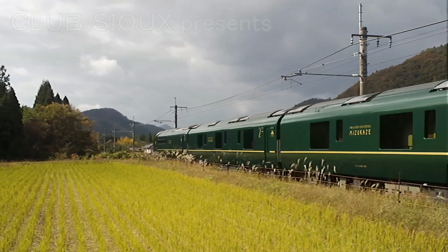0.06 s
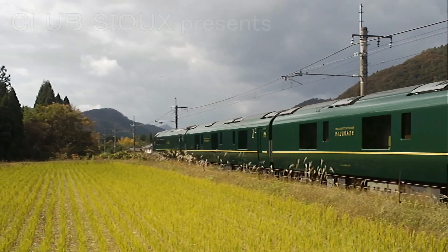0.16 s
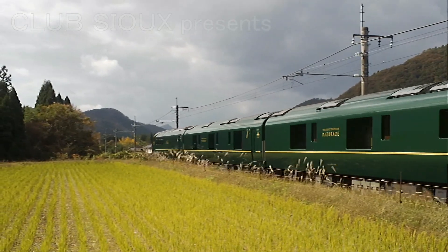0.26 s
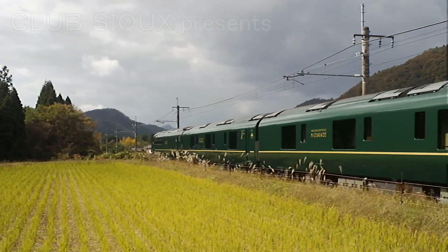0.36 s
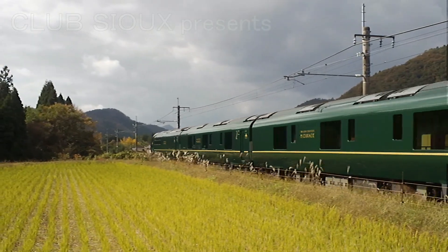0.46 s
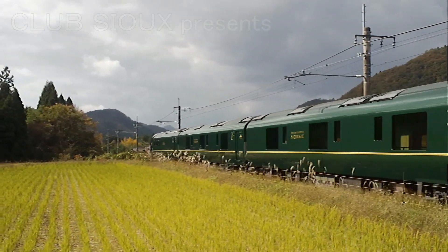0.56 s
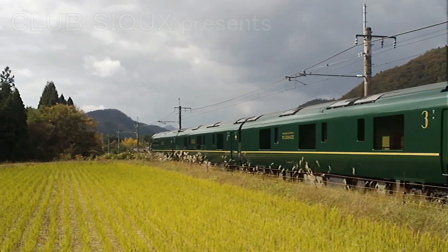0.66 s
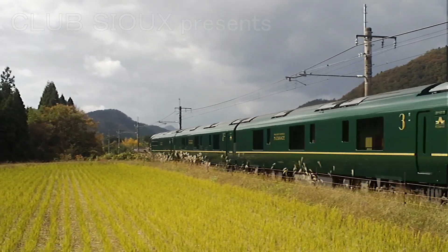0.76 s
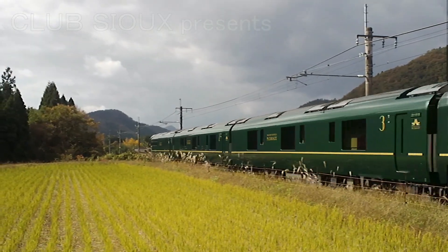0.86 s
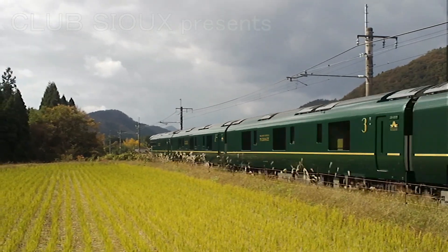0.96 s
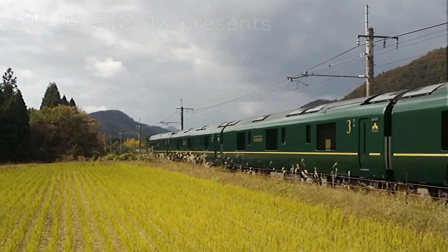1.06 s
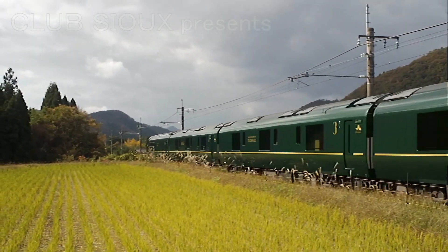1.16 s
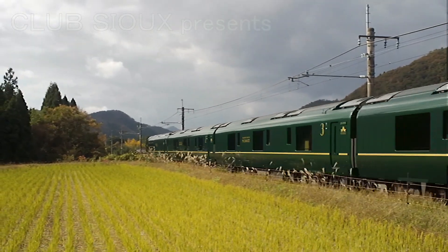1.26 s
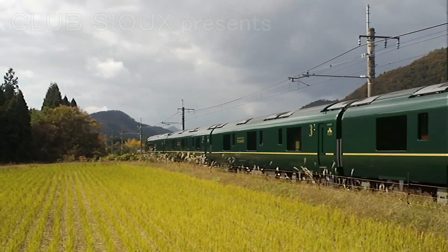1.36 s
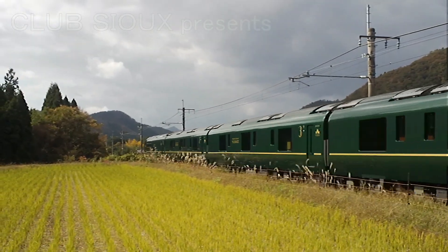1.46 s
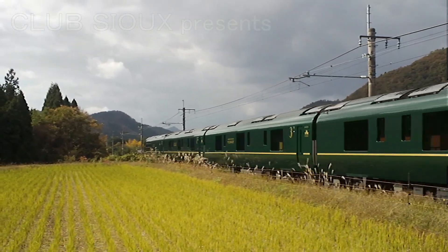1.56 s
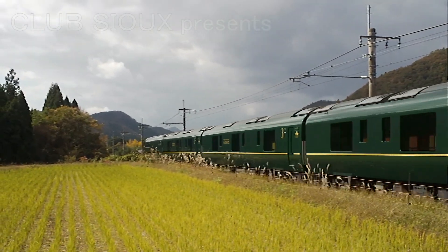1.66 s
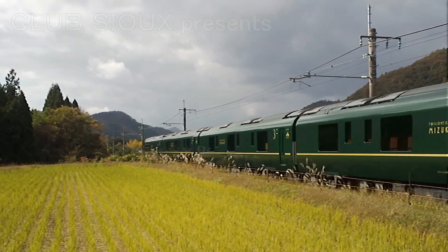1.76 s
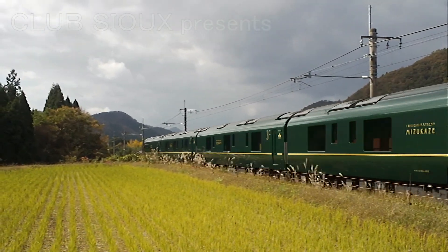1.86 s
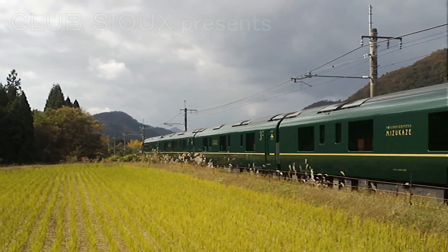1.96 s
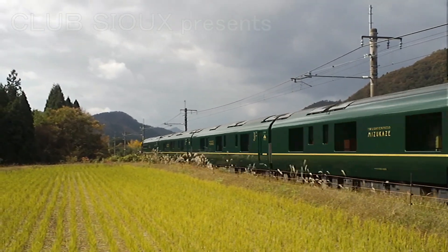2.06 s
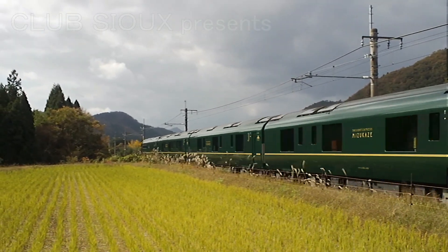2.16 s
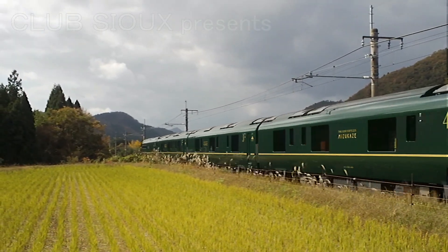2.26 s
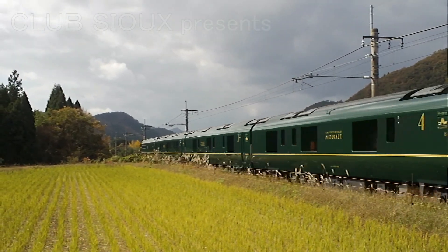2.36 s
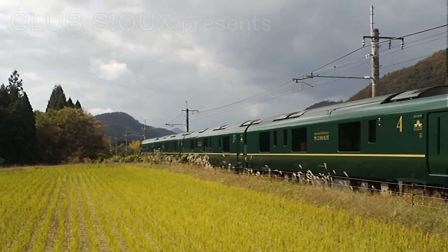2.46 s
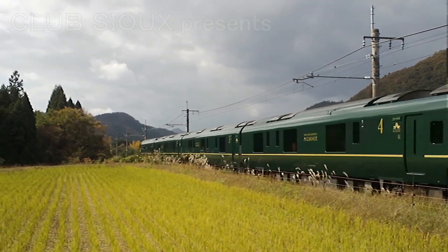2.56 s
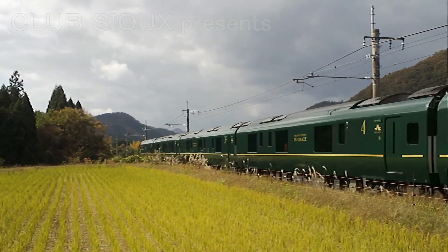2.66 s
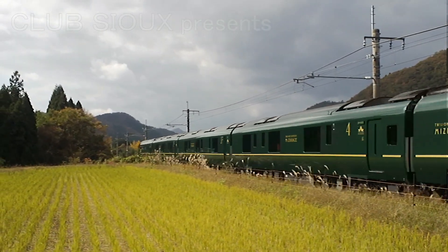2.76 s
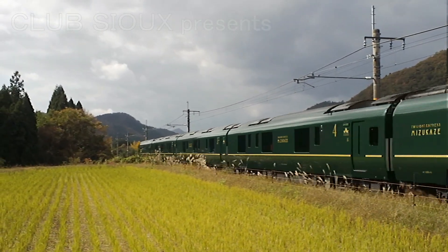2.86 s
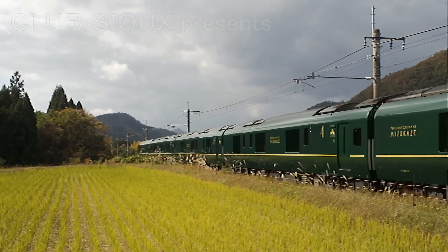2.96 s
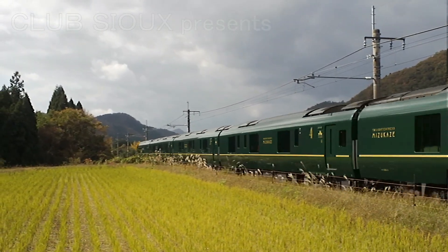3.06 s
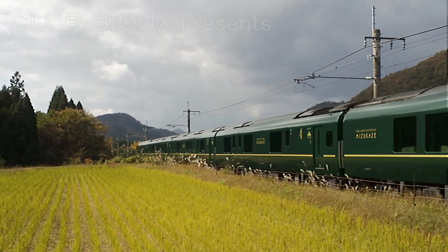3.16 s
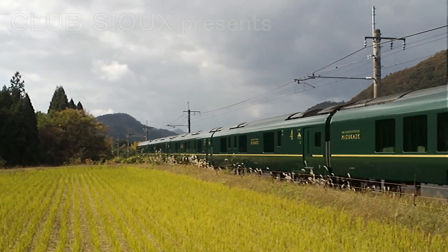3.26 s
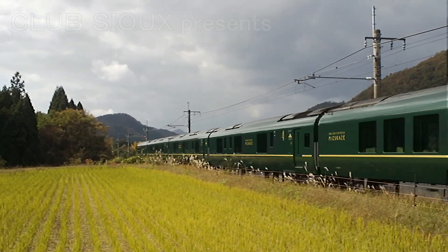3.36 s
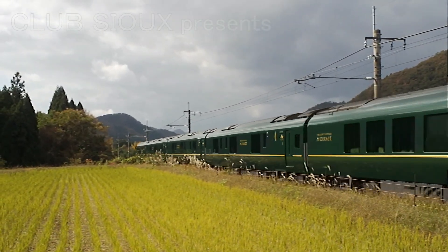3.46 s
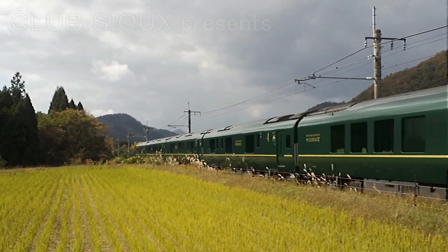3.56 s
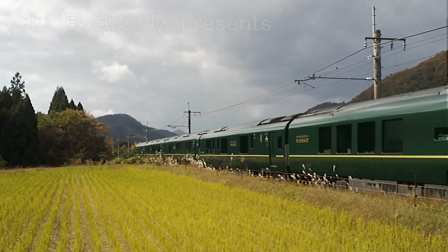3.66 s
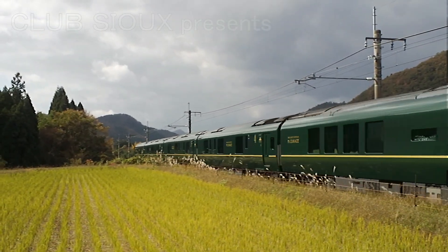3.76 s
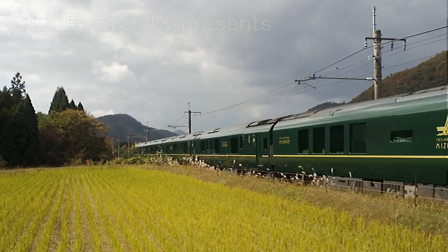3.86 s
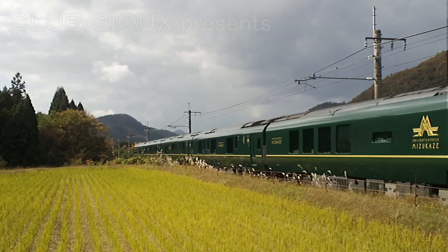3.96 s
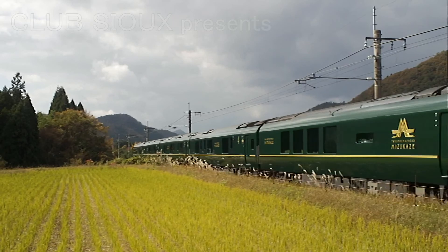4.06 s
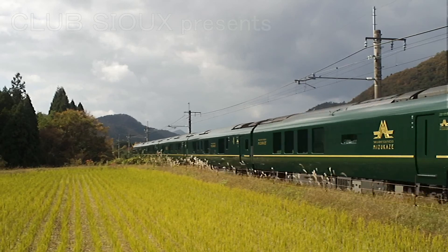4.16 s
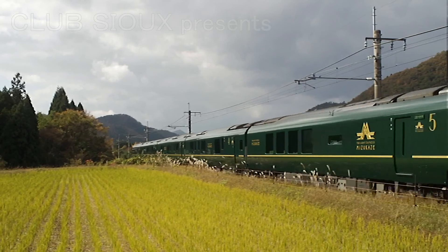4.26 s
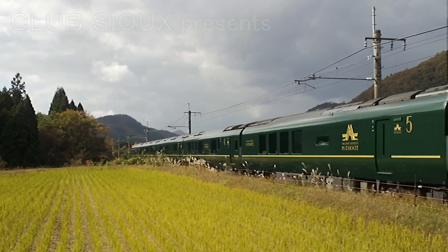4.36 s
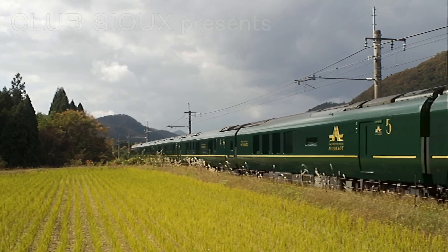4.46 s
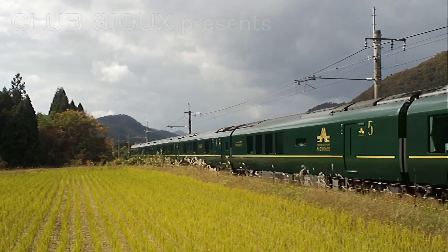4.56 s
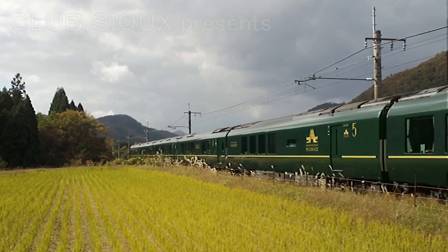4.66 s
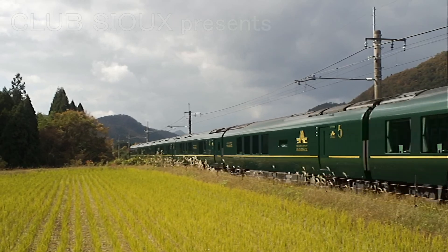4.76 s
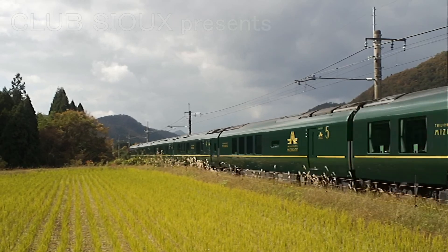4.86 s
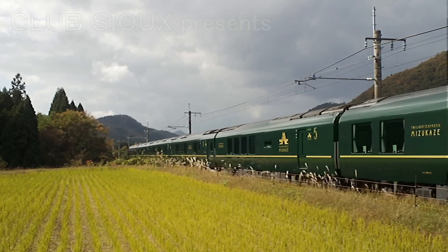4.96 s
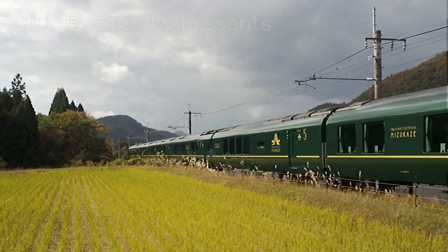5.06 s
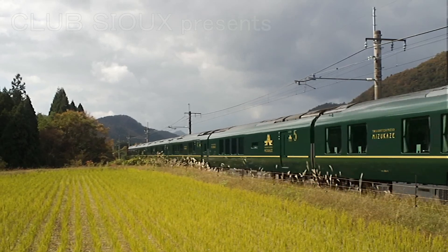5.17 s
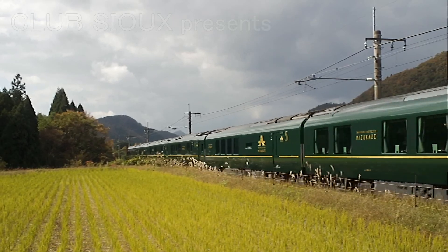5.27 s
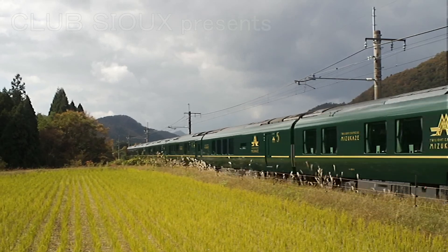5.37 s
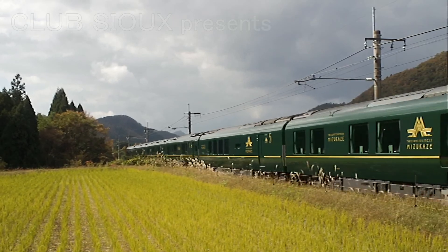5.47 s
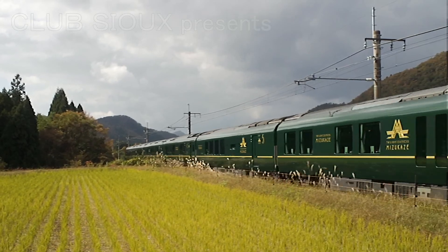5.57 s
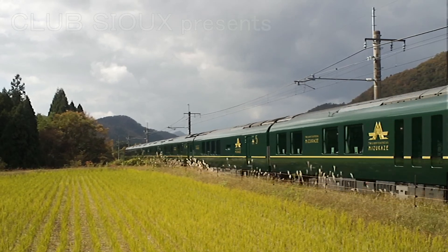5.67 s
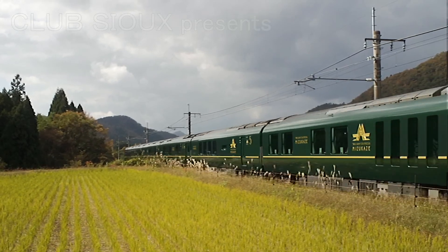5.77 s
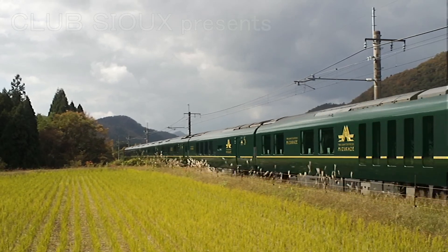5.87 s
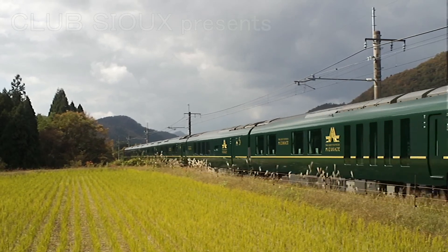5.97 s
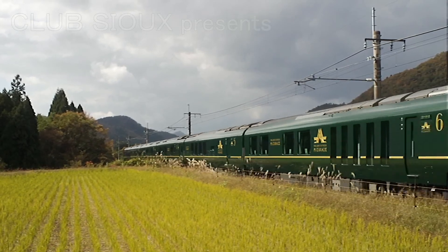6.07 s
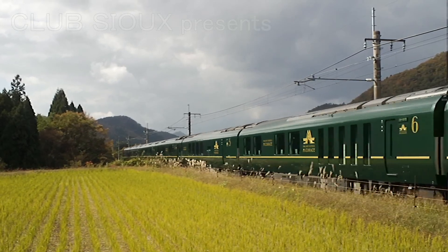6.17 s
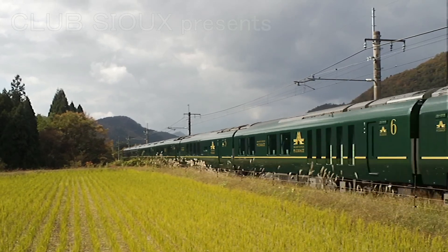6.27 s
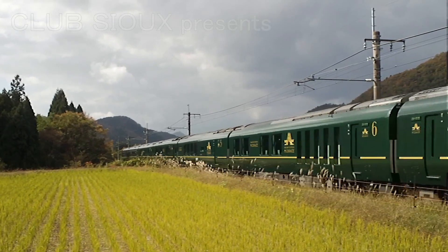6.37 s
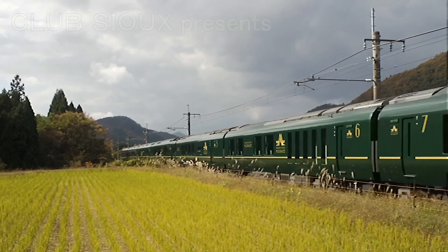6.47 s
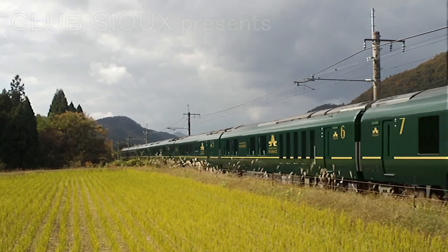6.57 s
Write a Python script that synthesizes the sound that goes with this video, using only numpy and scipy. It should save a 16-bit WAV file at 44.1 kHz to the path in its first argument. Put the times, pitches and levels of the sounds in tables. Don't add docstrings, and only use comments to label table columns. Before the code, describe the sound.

Beside an open field, a diesel passenger train passes steadily. Wheels strike a nearby rail joint in hard paired clunks, with softer thumps from farther joints between them. Rumble, rolling roar, thin hiss and droning underfloor engines with a faint whine fill the gaps. Wind flutters on the microphone, and a strong late gust overloads it.

```python
import sys
import numpy as np
from scipy import signal
from scipy.fft import rfft, irfft, next_fast_len
from scipy.io import wavfile
from scipy.ndimage import uniform_filter1d, map_coordinates

SR = 44100
rng = np.random.default_rng(int(sys.argv[2]) if len(sys.argv) > 2 else 0)


def dump(signal):
    limited = np.clip(np.atleast_2d(signal).T, -1, 1)
    pcm = np.round(limited * 32767).astype(np.int16)
    wavfile.write(sys.argv[1], SR, pcm)


def voltage_ratio(decibels):
    exponent = np.asarray(decibels, float) / 20
    return 10 ** exponent


N = 292383

# [start_s, level_db]
GUST = [(0, -19.5), (.3, -23), (.5, -24), (.75, -12.5), (.92, -13), (.98, -36), (3.5, -50.5), (3.7, -20),
        (4.3, -26), (4.5, -13), (4.6, -33.5), (5.5, -31), (5.57, -20), (5.67, -13.5), (5.8, -4),
        (6.27, -18), (6.39, -35), (6.63, -17)]
# [centre_s, level_db, length_s, bright_edge_db]
EDDIES = [(0.22, -19, 0.022, -29), (0.303, -14, 0.038, -24), (0.456, -21, 0.045, -28),
          (0.515, -16.5, 0.024, -40), (0.726, -15, 0.032, -29), (0.766, -6.5, 0.044, -17),
          (3.773, -22, 0.014, -19), (3.993, -9, 0.058, -9), (4.239, -27, 0.03, -16.5),
          (4.464, -17.5, 0.056, -28), (5.603, -3, 0.039, -27), (5.723, -10.5, 0.014, -21.8),
          (5.814, -4, 0.044, -26), (5.891, -6, 0.036, -30), (6.166, -11.5, 0.025, -23),
          (6.352, -15, 0.048, -17.9), (6.407, -8, 0.0073, -6), (6.562, -12.5, 0.026, -18)]
# [start_s, peak_db, extra_in_difference_db]
SLAPS = [
    (5.791, -17, -1),
    (5.838, -15, 8.5),
    (5.847, -16, 7),
    (5.898, -11.5, 1.5),
    (5.917, -17, 7),
    (5.924, -24, 8.5),
    (5.959, -20, 2),
    (6.032, -21, 8),
    (6.052, -19, 1),
    (6.208, -24, 10),
]
# [centre_s, half_length_s, level_db]
LULL = (5.868, 0.014, -9)
# [frequency_hz, density_db]
BUFFET = [(20, -15.5), (45, -13), (90, 1), (150, 2), (190, 0), (260, -7), (350, -9), (480, -17), (700, -48),
          (1000, -55), (2000, -58.5)]
# [start_s, peak_db, knock_db]
FAR_JOINTS = [
    (.08, -24, 9.5),
    (.252, -21, 7.5),
    (.446, -27.5, 14),
    (.622, -27.5, -3),
    (0.829, -35.5, 7.5),
    (.932, -26, 12.5),
    (1.103, -24, 9.5),
    (1.268, -27, 13),
    (1.453, -18.5, 10),
    (1.683, -22.5, 6.5),
]
# [frequency_hz, density_db]
RUMBLE = [(20, -49.5), (45, -14), (70, 1), (120, 0.5), (180, -2), (280, -3.5), (400, -5.5), (550, -14.5),
          (900, -34.5), (1500, -120)]
ROAR = [(150, -120), (300, 0), (500, -1), (700, 0), (1000, -3.5), (1400, -7.5), (2000, -9.5), (2800, -14.5),
        (4500, -21.5), (8000, -120)]
HISS = [(900, -120), (1600, -11), (2800, -3), (4000, -4), (5600, -5.5), (7700, -5.5), (9000, -21.5),
        (12000, -9.5), (14000, -25.5), (15200, -5)]
# [centre_hz, width_hz, level_db]
CASING = [(2680, 2600, 0)]
# [far_train_db, over_engines_db, over_bogies_db]
MIX = [
    (-31.5, -0.5, 8),
    (-42.5, -1, -0.5),
    (-46, -12.5, -9.5),
    (-59.5, -8.5, -19),
]
# [loudest_s, level_db]
BOGIES = [(.25, -46), (.5, -42.5), (.76, -29.5), (1.45, -29.5), (2.6, -38.5), (3.269, -29), (4.3, -29),
          (5.03, -34), (5.55, -36), (6.202, -38.5), (6.64, -40)]
# [approach_db_per_s, leaving_db_per_s]
BOGIE_FADES = (20, 43.4)
# [start_s, end_s, level_db]
ENGINES = [
    (0.84, 0.897, -25),
    (2.335, 2.587, -21),
    (4.093, 4.368, -22.5),
]
# [approach_db_per_s, leaving_db_per_s]
ENGINE_FADES = (26, 45)
# [start_s, end_s, level_db]
SURGES = [
    [(.04, .2, -26.5), (.75, .95, -23.5), (1.27, 1.42, -26.5), (2.08, 2.23, -20.5), (2.32, 2.62, -21),
     (2.82, 3.14, -23), (3.64, 4.44, -18.5), (4.85, 4.97, -22.5), (5.53, 5.72, -21.5), (5.95, 6.05, -25)],
    [(.08, .14, -29), (.74, .97, -17.5), (1.4, 1.58, -18.5), (1.65, 1.97, -27.5), (2.38, 2.63, -18),
     (2.8, 3.05, -23), (3.25, 3.44, -21.5), (3.7, 3.8, -20), (4.18, 4.64, -25), (4.84, 5.12, -24.5),
     (5.55, 5.7, -26.5), (6.36, 6.44, -31)],
]
# [start_s, end_s, level_db]
WHINE = [
    (.3, 1.2, -38.5),
    (1.28, 2.73, -26),
    (2.93, 4.15, -36),
    (3.3, 5.5, -36.5),
    (2.26, 2.47, -29),
    (3.54, 4.3, -30),
    (.3, 0.66, -29),
    (0.565, .85, -30),
]
# [start_s, peak_db, clank_db, tick_db, wheel_ring_db]
JOINT = [(0.935, -1.5, -12, -30, -25), (1.111, -4.5, -16.5, -27.5, -23), (1.5104, -6.5, -8, -26, -24.5),
         (1.6855, -7, -13, -29, -31), (2.706, -4.5, -14, -29, -31), (2.881, -5, -17, -28, -30),
         (3.28, -7, -9, -29, -33), (3.455, -6, -15, -25, -24), (4.473, -7, -8.5, -32, -34),
         (4.647, -4.5, -15.5, -26.5, -36), (5.045, -4.5, -9.5, -31, -32.5), (5.218, -8, -9.5, -26, -15),
         (6.233, -4, -11, -30, -21), (6.408, -5, -13.5, -33, -23)]
AXLES = [-4, 0]
# [centre_hz, width_hz, level_db]
RAIL = [(470, 83, -6.5), (613.5, 28, 0.5), (679, 107, -3), (933, 264, -7), (1126, 59, -3.5),
        (1490, 370, -14)]
CLANK = [(1690, 650, 1.5), (2247, 95, 8), (3060, 650, -7.5)]
SLEEPER = [(278, 40, 4), (416, 20, -11.5)]
# [frequency_hz, level_db, t60_s]
WHEEL = [(880, -1, .3), (2050, -8, .25), (2690, -2, .45), (2790, 0, .45), (3310, -9, .4), (3690, -9, .25)]
# [frequency_hz, t60_s]
FIELD = [(200, 0.2), (1000, 0.093), (3000, 0.1), (8000, 0.038)]
# [frequency_hz, level_db]
SCATTER = [(100, -22), (400, -8.5), (1000, -3.5), (2500, -7), (5000, -8), (8000, 5.5), (12000, 7.5)]
# [frequency_hz, left_lag_rad, left_minus_right_db]
PORTS = [(40, 1.93, -7), (171, 1.46, -4.5), (268, 1.11, -3), (470, 0.75, -3), (830, 0.58, -3.5),
         (1410, 0.69, 2), (1640, 1.7, 1), (2200, 1.3, -0.5), (3070, 1.86, 2), (4410, 2.48, 5),
         (6580, 2.94, 3), (8700, 4, 2), (15000, 3.8, 7.5)]
# [frequency_hz, level_db]
CAPSULE = [(25, 0), (60, 0), (8800, 0), (9400, -23), (9900, -25.5), (10400, -11), (10800, -8),
           (14200, -5.5), (15200, -15.5)]
# [start_s, bandwidth_hz]
CENTRE_TOP = [(0, 7800), (.6, 7400), (1.3, 6700), (1.75, 5300), (2.3, 7100), (2.7, 8100), (3.8, 8400),
              (4.4, 7200), (4.9, 8300), (6.1, 7300)]
# [start_s, end_s, share_0_to_1]
AIR = [
    (0, .1, .3),
    (1.2, 1.55, .55),
    (1.55, 2.58, .85),
    (3.65, 4.48, .8),
    (5.55, 5.98, .55),
    (6.35, 6.7, .4),
]
# [start_s, end_s]
OPEN = [
    (5.77, 5.85),
    (5.885, 5.925),
]


def unit(x):
    return x / np.sqrt(np.mean(x ** 2) + 1e-20)


def peaked(x):
    return x / np.abs(x).max()


def along(points, hz, column=1):
    table = np.transpose(points)
    return np.interp(np.log(hz + 1), np.log(table[0] + 1), table[column])


def curves(rows):
    s, *cols = np.transpose(rows)
    return [np.interp(np.arange(N) / SR, s, c) for c in cols]


def wobble(rate):
    knots = rng.standard_normal(int(N * rate / SR) + 4)
    return map_coordinates(knots, [np.arange(N) * rate / SR])


def filtered(x, response):
    m = next_fast_len(x.shape[-1] + 8192)
    return irfft(rfft(x, m) * response(np.fft.rfftfreq(m, 1 / SR)), m)[..., :x.shape[-1]]


def coloured(x, points):
    return filtered(x, lambda hz: voltage_ratio(along(points, hz)))


def resonant(x, modes):
    def response(f):
        total = 0
        for k, (centre, width, db) in enumerate(modes):
            damping = 1j * f * width
            total = total + (-1) ** k * voltage_ratio(db) * damping / (centre ** 2 - f * f + damping)
        return total
    return filtered(x, response)


def rush(spectrum, patchy_db, gate=1):
    z = signal.stft(gate * rng.standard_normal(N), nperseg=512)[2]
    patches = uniform_filter1d(uniform_filter1d(rng.standard_normal(z.shape), 6, 0), 12, 1)
    patchy = signal.istft(z * voltage_ratio(patchy_db * unit(patches)), nperseg=512)[1][:N]
    return unit(coloured(patchy, spectrum))


def passing(start, end, fades):
    t = np.arange(N) / SR
    return -fades[0] * np.maximum(start - t, 0) - fades[1] * np.maximum(t - end, 0)


def passing_power(events, fades):
    return sum(voltage_ratio(db + passing(a, b, fades)) ** 2 for a, b, db in events)


def wind():
    clock = np.arange(N) / SR
    body = voltage_ratio(curves(GUST)[0] + 0.86 * wobble(23)) ** 2
    edge = voltage_ratio(-32.5) ** 2 * body
    for s, db, length, edge_db in EDDIES:
        eddy = voltage_ratio(db) ** 2 * np.exp(-(2.3 * (clock - s) / length) ** 2)
        body = body + eddy
        edge = edge + voltage_ratio(edge_db - 8.5) ** 2 * eddy
    lull_s, half_s, lull_db = LULL
    lull = voltage_ratio(lull_db * np.exp(-((clock - lull_s) / half_s) ** 4)) ** 2
    body, edge = lull * body, lull * edge
    lip = [(624, 490, 0)]

    def turbulence():
        fast = unit(resonant(resonant(rng.standard_normal(N), lip), lip))
        return np.sqrt(body) * rush(BUFFET, patchy_db=-0.2) + np.sqrt(edge) * fast

    side = turbulence()
    mid = voltage_ratio(-12.5) * turbulence()
    t = np.arange(SR // 20) / SR
    for s, db, extra_db in SLAPS:
        flick = t * np.exp(-t / .0006) * (1 + 0.1 * rng.standard_normal(len(t)))
        slap = peaked(resonant(flick, [(474, 580, 12), (960, 300, -2.5)]))
        side[round(s * SR):][:len(t)] += voltage_ratio(db + 8.0 + extra_db) * slap
        mid[round(s * SR):][:len(t)] += voltage_ratio(db + 7.0) * slap
    return np.array([mid + side, mid - side])


def far_joints():
    car_s, gaining_s = 1.774, .0025
    out, t = np.zeros(N + 2 * SR), np.arange(SR // 4) / SR
    swell = t / 0.021 * np.exp(1 - t / 0.019)
    for car in range(4):
        for s, db, knock_db in FAR_JOINTS:
            start = round((s + car * (car_s - car * gaining_s)) * SR)
            pitch_hz = 58 * (1 + 0.055 * rng.normal())
            thump = np.sin(2 * np.pi * (pitch_hz * t + rng.random())) * swell
            knock = peaked(resonant(rng.standard_normal(len(t)) * swell ** 2, SLEEPER))
            blow = thump + voltage_ratio(knock_db - 5.0) * knock
            out[start:][:len(t)] += voltage_ratio(db + rng.normal(0, 1.5) + 5.0) * blow
    return out[:N]


def rolling(firing):
    bays = passing_power(ENGINES, ENGINE_FADES)
    wheels = passing_power([(s, s, db) for s, db in BOGIES], BOGIE_FADES)
    rumble, roar, hiss, casing = [np.sqrt(voltage_ratio(far) ** 2 + voltage_ratio(engine) ** 2 * bays + voltage_ratio(bogie) ** 2 * wheels)
                                  for far, engine, bogie in MIX]
    clatter_far, clatter_near = 0.022, 0.067
    share = np.clip(clatter_far + clatter_near * bays / bays.max(), 0, 1)
    gate = 1 - share + share * firing
    rumble = rumble * voltage_ratio(4.5 + 1.6 * wobble(14)) * rush(RUMBLE, patchy_db=1.64)
    roar = roar * voltage_ratio(4 + 0.23 * wobble(11)) * rush(ROAR, patchy_db=1.5, gate=gate)
    hiss = hiss * voltage_ratio(6) * rush(HISS, patchy_db=1.0, gate=gate)
    casing = casing * unit(resonant(resonant(gate * rng.standard_normal(N), CASING), CASING))
    return rumble + roar + casing + hiss


def engines():
    t = np.arange(N) / SR
    orders_hz, orders_sag = (93.56, 139.3), (0.74, 1.25)
    surge_fades = (154, 180)  # rise, fall (dB per s)
    far_db, beating_db = -32, 2.5
    tones, turns = np.zeros(N), []
    for hz, sag, surges in zip(orders_hz, orders_sag, SURGES):
        turn = np.cumsum((hz - sag * t) * (1 + 0.0044 * wobble(6))) / SR
        power = voltage_ratio(far_db) ** 2 + passing_power(surges, surge_fades)
        tones += voltage_ratio(1.5 + beating_db * wobble(11)) * np.sqrt(2 * power) * np.sin(2 * np.pi * turn)
        turns.append(turn)
    whine_hz, whine_sag = [489, 483, 463, 481, 401, 428, 290, 398], 9.5
    for (a, b, db), hz in zip(WHINE, whine_hz):
        level_db = db + passing(a, b, (90, 90)) + 1.7 * wobble(7.82)
        tones += voltage_ratio(level_db) * np.sin(2 * np.pi * np.cumsum(hz - whine_sag * (t - a)) / SR)
    firing = unit((1 + np.cos(np.pi * turns[0])) ** 3)
    return tones, firing


def detuned(modes):
    return [(hz * rng.normal(1, .035), 1.6 * width, db + rng.normal(0, 2.5)) for hz, width, db in modes]


def wheel_ring(t, ring_db, noise):
    flutter = voltage_ratio(4 * unit(uniform_filter1d(noise, size=500)))
    onset = 1 - np.exp(-t / 0.005)
    ring = np.zeros(len(t))
    for hz, level_db, t60 in WHEEL:
        decay = voltage_ratio(ring_db + level_db - 9 + rng.normal(0, 1.6) - 60 * t / t60)
        ring += decay * np.sin(2 * np.pi * hz * t)
    return flutter * onset * ring


def joint():
    out, t, lead = np.zeros(N + SR), np.arange(SR // 2) / SR, round(0.00915 * SR)

    def contact(at):
        return np.exp(-((t - at) / .00007) ** 2)

    rattle = 0.15 * voltage_ratio(-60 * t / 0.014) + 0.28 * voltage_ratio(-60 * t / 0.16)
    sizzle = voltage_ratio(-60 * t / 0.011) + 0.37 * voltage_ratio(-60 * t / 0.29)
    thud = peaked(resonant(np.exp(-((t - .003) / 0.0013) ** 2), SLEEPER))
    unloading = np.sin(2 * np.pi * 270 * t[:lead]) * np.hanning(lead)
    for (s, db, clank_db, tick_db, ring_db), thud_db in zip(JOINT, AXLES * len(JOINT)):
        noise = rng.standard_normal((3, len(t))) * (1 - np.exp(-t / 0.00081))
        strike = contact(.0006) + .6 * contact(rng.uniform(.002, .0045))
        rail = resonant(resonant(noise[0] * rattle - strike, detuned(RAIL)), [(835, 2600, 0)])
        clank = resonant(noise[1] * rattle - strike, detuned(CLANK))
        crack = resonant(.1 * noise[0] * voltage_ratio(-60 * t / .012) - strike, [(1250, 2400, 0)])
        tick = coloured(noise[2] * sizzle, HISS)
        hit = 0.91 * peaked(rail)
        hit += voltage_ratio(clank_db + 5.0) * peaked(clank)
        hit += voltage_ratio(clank_db + 9) * peaked(crack)
        hit += voltage_ratio(tick_db + 12.5) * peaked(tick)
        hit += voltage_ratio(thud_db + 1.5) * thud
        hit += wheel_ring(t, ring_db, noise[2])
        start = round(s * SR)
        out[start:][:len(t)] += voltage_ratio(db + 1.5) * hit
        out[start - lead:][:lead] -= voltage_ratio(db + thud_db - 3) * unloading
    return out[:N]


def echoes(x):
    hz, t, z = signal.stft(rng.standard_normal((2, SR // 3)), SR, nperseg=256)
    tail = signal.istft(z * voltage_ratio(-60 * t / along(FIELD, hz)[:, None]), SR, nperseg=256)[1]
    wet = signal.fftconvolve(x[None], tail / np.linalg.norm(tail[0]), axes=1)[:, :N]
    return coloured(wet, SCATTER)


def ports(x):
    left = filtered(x, lambda hz: voltage_ratio(along(PORTS, hz, column=2)) * np.exp(-1j * along(PORTS, hz)))
    return np.array([left, x])


def starved(x, spared_db=4):
    hz, t, z = signal.stft(np.array([x[0] + x[1], x[0] - x[1]]) / 2, SR, nperseg=2048)
    share = np.maximum(.07, sum(kept * ((t >= a) & (t < b)) for a, b, kept in AIR))
    band, hz = (hz // 690).astype(int), hz[:, None]
    luck = rng.random((2, band.max() + 1, len(t) // 2 + 1)).repeat(2, axis=2)[:, band, :len(t)]
    air = (hz > 10700) & (hz < 13700)
    below_top = hz < np.interp(t, *np.transpose(CENTRE_TOP)) + 2200 * (luck[0] - .5)
    engine_band = (hz > 7500) & (hz < 8700) & (t > 1.8) & (t < 2.4)
    gust_open = np.any([(t >= a) & (t < b) for a, b in OPEN], axis=0)
    centre = below_top | (air | engine_band) & (luck[0] < .8 * share)
    centre |= gust_open & (luck[0] < .9)
    difference = (hz < 9350) | (hz > 10500) & (hz < 13600 + 1500 * luck[1])
    level = uniform_filter1d(np.abs(z), size=32, axis=1)
    sudden = level > voltage_ratio(spared_db) * uniform_filter1d(level, size=11, axis=2)
    strong = sudden & ((hz < 9300) | air) & (luck > .2)
    mid, side = signal.istft(z * (np.array([centre, difference]) | strong), SR, nperseg=2048)[1][:, :N]
    return np.array([mid + side, mid - side])


def scene():
    tones, firing = engines()
    steady, hits = rolling(firing), joint()
    direct = ports(tones + steady + hits + far_joints())
    return direct + echoes(voltage_ratio(-8.5) * steady + voltage_ratio(-3.5) * hits) + wind()


def band_limit(x):
    return signal.sosfilt(signal.butter(12, 15170, fs=SR, output="sos"), x)


def record(dry):
    heard = coloured(dry, CAPSULE)
    clipped = heard / (1 + np.abs(heard) ** 24) ** (1 / 24)
    return band_limit(starved(clipped))


dry = scene()
out = record(dry)
dump(out)
```